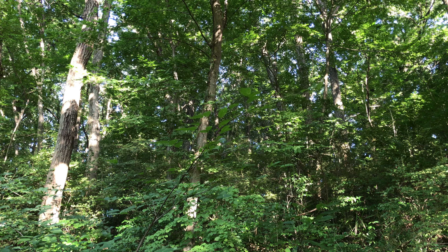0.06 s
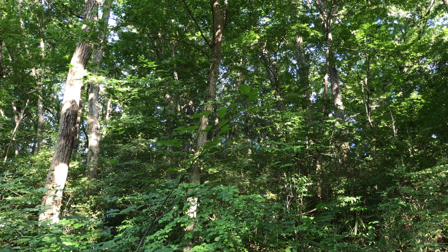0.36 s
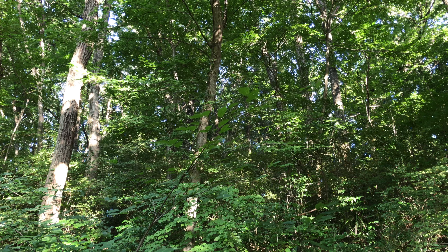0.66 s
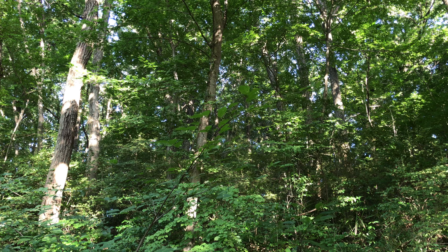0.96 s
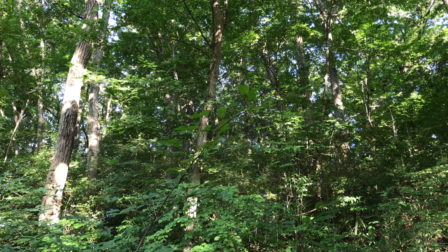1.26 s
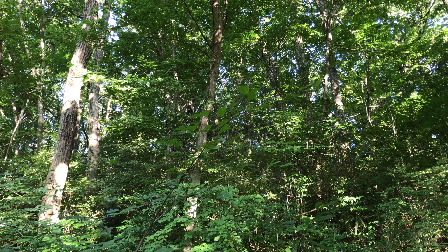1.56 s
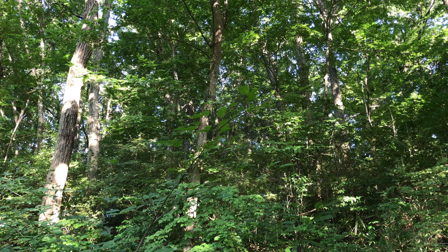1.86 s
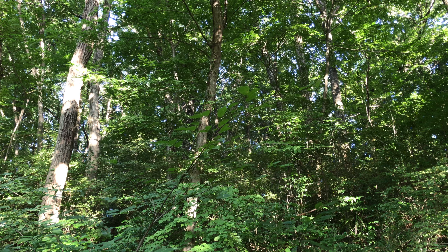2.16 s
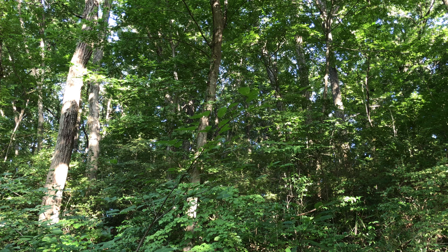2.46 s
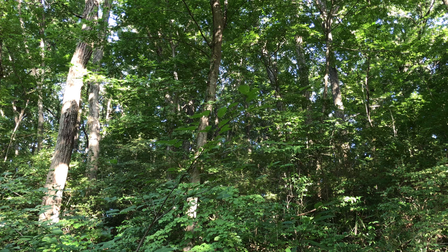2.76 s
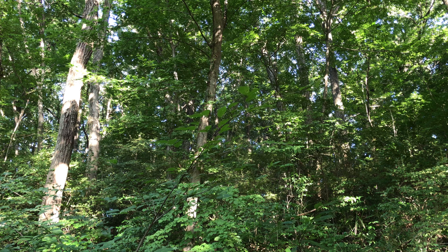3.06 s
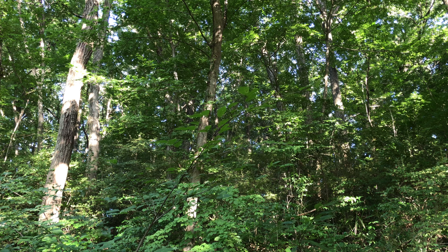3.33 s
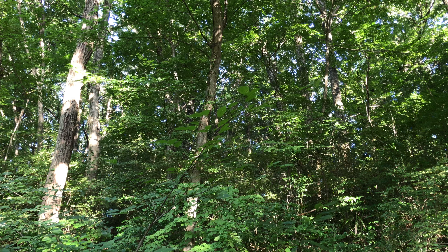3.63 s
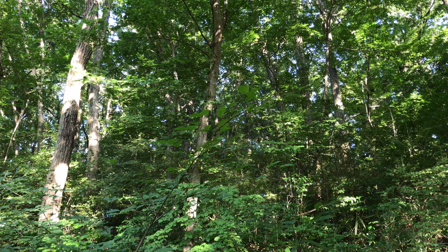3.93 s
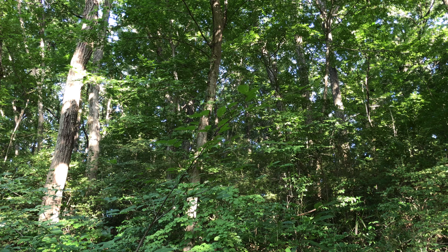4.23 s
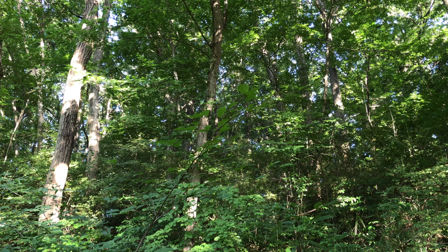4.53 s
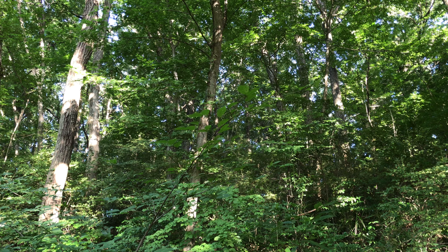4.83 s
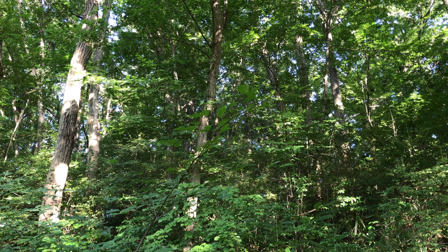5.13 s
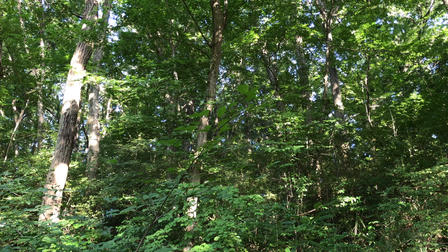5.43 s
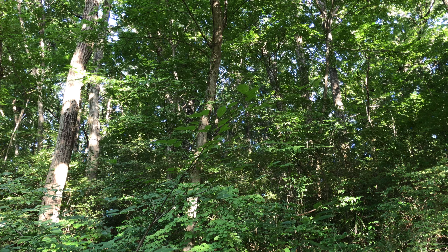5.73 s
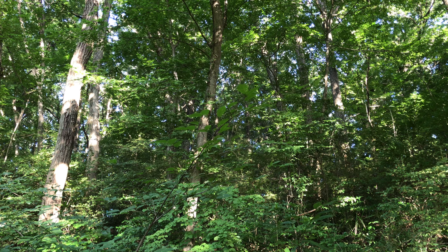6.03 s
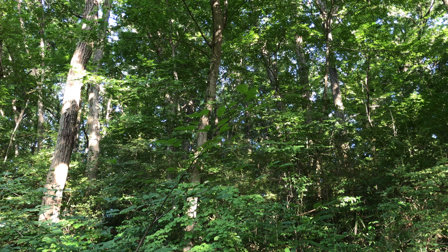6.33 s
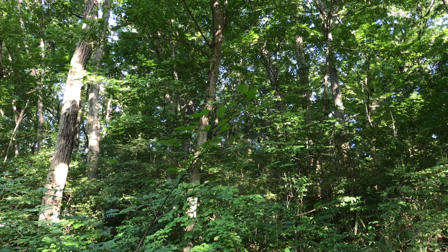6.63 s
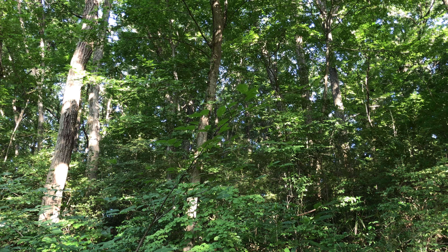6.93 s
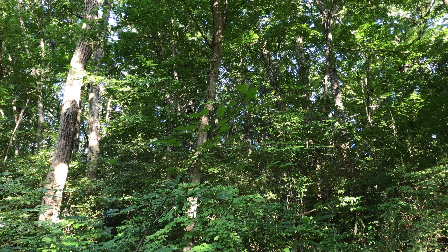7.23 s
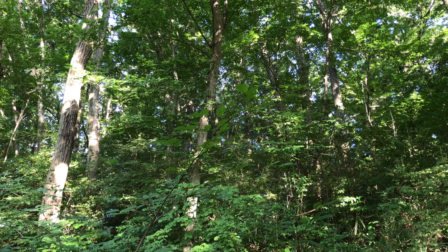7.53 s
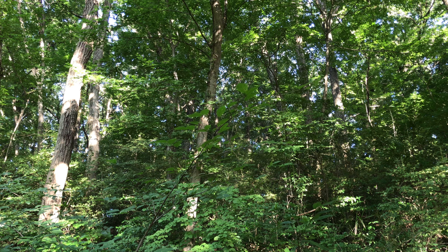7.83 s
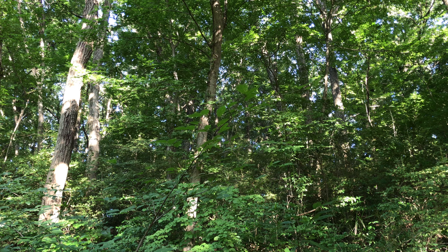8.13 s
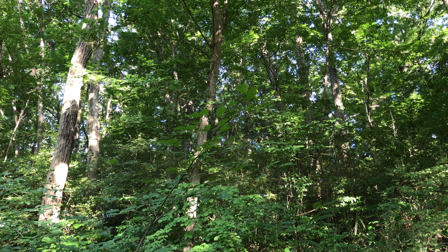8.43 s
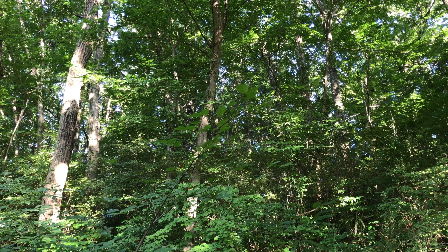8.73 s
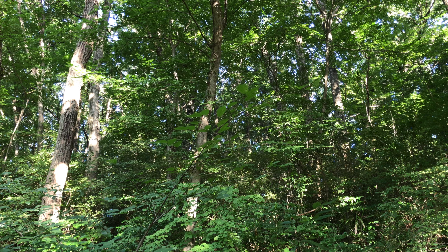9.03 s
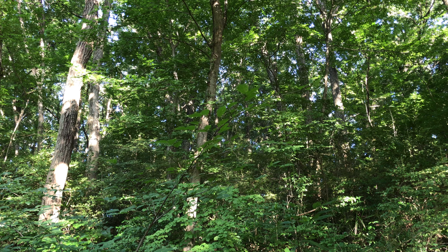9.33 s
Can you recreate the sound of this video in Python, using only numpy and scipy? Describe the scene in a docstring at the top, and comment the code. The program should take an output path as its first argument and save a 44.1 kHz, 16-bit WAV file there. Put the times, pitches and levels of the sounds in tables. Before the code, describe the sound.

In a forest, two cicadas trill close to the microphone, one joining the other in quick ringing pulses that sag in pitch, slow and fade. After a lull with faint far calls, several swell together more loudly, and new trills begin near the end. A distant chorus comes in waves. A thin insect sizzle and a faint low rumble continue throughout.

```python
"""A buzzing cicada trill swells close to the microphone, over a thin sizzle: evening in a summer forest.
Single cicadas trill, most close by, a few faint and far off: runs of short syllables from buckling
tymbal ribs that swell, sag in pitch and slow down. A distant chorus answers in waves. Day cicadas keep
up the sizzle, and one very high insect pulses, climbing in pitch. Leaves and trunks scatter the
insects' sound, and a faint low rumble lies beneath."""
import sys
import numpy as np
from scipy import signal
from scipy.fft import rfft, irfft, next_fast_len
from scipy.io import wavfile

SR = 44100
rng = np.random.default_rng(int(sys.argv[2]) if len(sys.argv) > 2 else 0)


def store_wav(level_fs):
    """Save 16-bit WAV to argv[1]."""
    pcm = np.round(np.clip(np.atleast_2d(level_fs), -1, 1) * 32767)
    wavfile.write(sys.argv[1], SR, pcm.T.astype(np.int16))


N = 414099
TIME = np.arange(N) / SR


def from_db(db):
    """Decibels to gain."""
    return 10 ** (np.asarray(db) / 20)


def rms_one(x):
    """Scale to rms 1."""
    return x / np.sqrt(np.mean(x ** 2) + 1e-20)


def in_time(rows):
    """Each column of a timed curve at every sample."""
    time_s, *columns = np.transpose(rows)
    return [np.interp(TIME, time_s, column) for column in columns]


def drift(rate_hz):
    """Slow random wander with a spread of about 1."""
    pole = np.exp(-20 * np.pi * rate_hz / SR)   # runs at a tenth of the sample rate
    slow = signal.lfilter([1], [1, -2 * pole, pole * pole], rng.standard_normal(N // 10 + 8002))[8000:]
    return np.interp(np.arange(N) / 10, np.arange(len(slow)), rms_one(slow))


def coloured_noise(spectrum, skirt_db):
    """Noise of rms 1 with a given spectrum, falling by skirt_db an octave beyond its ends."""
    size = next_fast_len(N)
    hz, db = np.transpose(spectrum)
    octave = np.log2(np.arange(size // 2 + 1) * SR / size + 1)
    beyond = np.abs(octave - np.clip(octave, np.log2(hz[0]), np.log2(hz[-1])))
    gain = from_db(np.interp(octave, np.log2(hz), db) - skirt_db * beyond)
    return rms_one(irfft(rfft(rng.standard_normal(N), size) * gain, size)[:N])


def moving_band(centre_hz, width_hz):
    """Noise in a resonance whose centre moves."""
    lowpass = signal.butter(1, width_hz / 2, fs=SR, output="sos").repeat(2, axis=0)
    slow = signal.sosfilt(lowpass, rng.standard_normal((2, N)))
    phase = 2 * np.pi * np.cumsum(centre_hz) / SR
    return rms_one(slow[0] * np.cos(phase) + slow[1] * np.sin(phase))


def add(out, centre_s, sound):
    """Mix a sound in, centred on a moment."""
    at = int(centre_s * SR) - len(sound) // 2 + np.arange(len(sound))
    inside = (at >= 0) & (at < N)
    out[at[inside]] += sound[inside]


def forest(x, leaves_db, trunks_db, leaves_t60, trunks_t60=1.0):
    """The way to the microphone: direct sound, quick scatter off leaves, a long tail off trunks."""
    decays = from_db(-60 * TIME[:SR] / np.array([[leaves_t60], [trunks_t60]]))
    leaves, trunks = rng.standard_normal((2, SR)) * decays
    echoes = (from_db(leaves_db) * rms_one(leaves) + from_db(trunks_db) * rms_one(trunks)) / np.sqrt(SR)
    echoes[0] = 1   # the direct sound
    return signal.fftconvolve(x, echoes / np.linalg.norm(echoes))[:N]


# Spectrum of the far rumble: frequency_hz, relative_db
RUMBLE_SPECTRUM = [(25, -31), (34, -14.5), (48, 1.5), (61, -3), (78, -6), (100, -12), (146, -19.5),
                   (275, -22.5), (493, -29), (900, -31.5), (1500, -34.5), (2400, -32)]


def rumble(level_db=-54.0, hum_hz=64, hum_db=-58.5):
    """A far low rumble that thins out into faint hiss, with a wavering hum in it."""
    low = from_db(level_db) * coloured_noise(RUMBLE_SPECTRUM, skirt_db=12)
    hum_rms = from_db(hum_db + 1.2 * drift(1.9))
    hum_phase = 2 * np.pi * np.cumsum(hum_hz + 1.67 * drift(4.3)) / SR
    return low + hum_rms * np.sqrt(2) * np.sin(hum_phase)


# Loudness of the day cicadas at the microphone: time_s, level_db
SIZZLE_LEVEL = [(0, -43.5), (1, -42.5), (2.5, -41.5), (4.2, -42), (5.5, -41.5), (7.2, -40.5), (8.3, -42),
                (9.39, -42)]
# Spectrum of their sizzle: frequency_hz, relative_db
SIZZLE_SPECTRUM = [(1700, -48), (2350, -25.5), (2750, -21), (3200, -25.5), (3700, -19), (4300, -9),
                   (5000, -4.5), (5750, -0.5), (6400, -3.5), (7400, -11), (8400, -5), (9200, -11.5),
                   (10200, -20.5), (11300, -13), (16000, -18)]


def day_cicadas(flicker_db=0.14):
    """Out in the trees, so many rasp without a break that their clicks merge into a sizzle."""
    level_db, = in_time(SIZZLE_LEVEL)
    rasp = from_db(level_db + flicker_db * drift(25)) * coloured_noise(SIZZLE_SPECTRUM, skirt_db=24)
    return forest(rasp, leaves_db=-5.5, trunks_db=-7.5, leaves_t60=0.082)


# The high insect's climb, heard through leaves: time_s, centre_hz, relative_db, pulses_per_s
INSECT_CLIMB = [(0, 11320, -79, 16), (1.5, 11880, -73, 15.5), (3, 12840, -57, 15.2),
                (4.3, 12960, -54.5, 15.2), (5.5, 13700, -52.5, 15.7), (7, 13830, -48.5, 14.6),
                (8.2, 14240, -48.5, 15.3), (9.39, 14500, -47, 14.3)]


def high_insect(pulse_db=2.5, buzz_hz=385, buzz_depth=0.27, octave_db=-6, gain_db=3.5):
    """A pulsing rasp in one broad resonance that climbs slowly, with a weaker one an octave below."""
    centre_hz, level_db, pulses_per_s = in_time(INSECT_CLIMB)
    pulse_phase = 2 * np.pi * np.cumsum(pulses_per_s * (1 + 0.038 * drift(4.2))) / SR
    pulses = rms_one(from_db(pulse_db * np.cos(pulse_phase)))
    buzz_phase = 2 * np.pi * np.cumsum(buzz_hz * (1 + .015 * drift(7.7))) / SR
    rasp = 1 + buzz_depth * np.cos(buzz_phase)
    ring = moving_band(centre_hz, width_hz=3300)
    ring += from_db(octave_db) * moving_band(centre_hz / 2, width_hz=3800)
    call = from_db(level_db + gain_db) * pulses * rasp * ring
    call = signal.sosfilt(signal.butter(4, 4200, "high", fs=SR, output="sos"), call)
    return forest(call, leaves_db=5, trunks_db=-16, leaves_t60=0.15)


def syllable(pitch_hz, body, throb=0.25, swing=0.061, arch=0.00891, jitter=0.00827, slack_hz=2100):
    """Tymbal ribs buckle in quick succession and keep the hollow abdomen ringing on its partials."""
    rib_hz, length_s, *partials_db = body
    length_s *= min(pitch_hz / slack_hz, 1) ** 9   # a slack body sings low and short
    position = np.linspace(-1, 1, int(length_s * SR))
    unsteady, uneven, force = [np.interp(position, np.linspace(-1, 1, len(row)), row)
                               for row in rng.standard_normal((3, 18))]
    offsets = rng.uniform(0, 2 * np.pi, len(partials_db) + 1)
    ribs = offsets[0] + 2 * np.pi * np.cumsum(rib_hz * (1 + 0.093 * uneven)) / SR
    # the pitch arches with the muscle's pull and dips at each buckle
    arched_hz = pitch_hz * (1 - arch * position ** 2 + jitter * unsteady)
    phase = 2 * np.pi * np.cumsum(arched_hz) / SR - swing * np.sin(ribs)
    # higher partials die sooner between buckles, so they throb more deeply
    buckle = throb * np.cos(ribs)
    tone = sum(from_db(db) * (1 + np.sqrt(k) * buckle) * np.sin(k * phase + offsets[k])
               for k, db in enumerate(partials_db, 1))
    # each buckle also makes a faint bright click
    bright_noise = np.diff(np.resize(rng.standard_normal(4096), len(position) + 1))
    clicks = from_db(-27) * bright_noise * (1 + np.cos(ribs)) / 2
    envelope = np.clip((1 - np.abs(position)) / 0.24, 0, 1)
    return (tone + clicks) * envelope * rms_one(from_db(2.6 * force))


def song_contour(age, pitch_hz, scoop_hz, sag_hz_per_s, full_db, soft_db, rise_s, fade_from_s,
                 fade_db_per_s, scoop_s=.35):
    """Pitch and level at each age of a song: it pulls up to pitch and sags; it swells, holds and fades."""
    hz = pitch_hz - scoop_hz * np.exp(-age / scoop_s) - sag_hz_per_s * age
    swell_db = -soft_db * np.maximum(1 - age / rise_s, 0)
    fade_db = -fade_db_per_s * np.maximum(age - fade_from_s, 0)
    return hz, full_db + swell_db + fade_db


# The body shared by the distant chorus: rib_hz, syllable_s, partial_2_db to partial_5_db
FAR_BODY = (298.5, 0.23, 3, -8.5, -9, -17)
# Waves of song from deep in the forest: start_s, detune_share, partial_1_db, pitch_hz, scoop_hz,
# sag_hz_per_s, full_db (relative), soft_db, rise_s, fade_from_s, fade_db_per_s
FAR_WAVES = [(-3.5, .028, -12,   2240, 50, 18,   -37, 18, .8, 1.72, 9.5),
             (0.42, .032, -7.5,   2210, 55, 21,   -38, 15.5, 0.77, 1.73, 9.5),
             (5, .02, -12,   2180, 110, 26.6,   -30.5, 22, 0.69, 0.95, 11),
             (8.5, .031, -8.5,   2225, 51, 25,   -40.5, 6, 0.47, 1.8, 10)]


def far_chorus(syllables_per_s=70, count=350, carry=.15):
    """Many distant singers, each a little off the common pitch, blur into a shimmering band."""
    rib_hz, length_s, *overtones_db = FAR_BODY
    chorus = np.zeros(N)
    for start_s, spread, lowest_db, *song in FAR_WAVES:
        late, detune = rng.standard_normal((count, 2)).T
        age = np.abs(np.arange(count) + late / 2) / syllables_per_s
        pitch_hz, level_db = song_contour(age, *song)
        pitch_hz *= 1 + spread * detune
        # the lowest partial carries best, so it stands out more where the wave is quiet
        carried_db = lowest_db + carry * (level_db.max() - level_db)
        for at_s, hz, db, low_db in zip(start_s + age, pitch_hz, level_db, carried_db):
            if -length_s < at_s < N / SR + length_s:
                add(chorus, at_s, from_db(db) * syllable(hz, (rib_hz, length_s, low_db, *overtones_db)))
    overlap = syllables_per_s * length_s
    return forest(chorus / np.sqrt(overlap), leaves_db=4.5, trunks_db=4.0, leaves_t60=0.12)


def trill_rhythm(count, first_gap_s, slowing_s, drag_s, tiring_syllables=2.2):
    """Age of each syllable: the gaps widen steadily, then drag as the singer tires over the last few."""
    k = np.arange(count - 1)
    gaps = first_gap_s + slowing_s * k + drag_s * np.exp((k - k[-1]) / tiring_syllables)
    return np.append(0, np.cumsum(gaps))


# Single cicadas in the trees, most close to the microphone, row 4 (from 0) far off:
# echo_db (relative), rib_hz, longest_syllable_s, partial_1_db to partial_5_db
SINGERS = [(-6, 305, .046, -19, -0.5, -19, -14.5, -30), (1, 300, .042, -14.5, -2.2, -7.5, -2.5, -19),
           (-5.5, 315, .04, -8.5, 0.5, -7, -5, -21), (-0.5, 230, 0.0478, -7, 0.8, -7, -1.5, -10.5),
           (0.5, 222, .056, -0.5, 3.5, -19, -14, -22), (-2.5, 325, .037, -15.5, -4, -8, -2.5, -10)]
# Their trills: start_s, singer_row, syllable_count, first_gap_s, slowing_s, drag_s, pitch_hz, scoop_hz,
# sag_hz_per_s, full_db (relative), soft_db, rise_s, fade_from_s, fade_db_per_s
TRILLS = [(-0.9, 4, 15, .095, .001, .01, 2160, 20, 15, -62, 5, .4, 1.5, 6),
          (0.329, 0, 32, .0843, .00073, .061, 2080, 225, 15, -37.2, 3, .6, 1.9, 11),
          (1.076, 1, 20, .0914, .00094, .081, 2150, 10, 22, -37, 5, .4, 1.75, 16),
          (2.35, 4, 16, .12, .001, .06, 2330, 10, 30, -57, 2, .3, .8, 8),
          (3.09, 4, 16, .118, .001, .03, 2130, 10, 20, -59, 2, .2, .5, 2.5),
          (5.129, 2, 23, .0826, .00089, .174, 2165, 150, 52, -31.3, 14, .35, 1.95, 6),
          (5.24, 3, 33, .0884, .00087, .032, 2250, 90, 38, -36.2, 8, .25, 1.5, 5.5),
          (5.431, 5, 24, .0924, .00068, .239, 2170, 30, 42, -33.3, 20, .55, 1.5, 1.5),
          (8.462, 0, 32, .08, .001, .061, 2060, 205, 15, -36.2, 2.5, .6, 1.9, 11),
          (8.984, 1, 20, .094, .00094, .081, 2145, 15, 15, -36, 3, .4, 1.75, 16)]


def single_trills(gain_db=0.63, timid_db=-8.5, scatter_db=0.57, scatter_hz=12):
    """Each singer trills from its own tree and so has echoes of its own."""
    trees = np.zeros((len(SINGERS), N))
    for start_s, singer, count, first_gap_s, slowing_s, drag_s, *song in TRILLS:
        body = SINGERS[singer][1:]
        age = trill_rhythm(count, first_gap_s, slowing_s, drag_s)
        pitch_hz, level_db = song_contour(age, *song)
        detune, push = rng.standard_normal((count, 2)).T
        pitch_hz += scatter_hz * detune
        level_db += gain_db + scatter_db * push
        level_db[0] += timid_db   # a trill opens with a timid syllable
        for at_s, hz, db in zip(start_s + age, pitch_hz, level_db):
            add(trees[singer], at_s, from_db(db) * syllable(hz, body))
    return sum(forest(tree, leaves_db=echo_db - 4.0, trunks_db=echo_db + 3.0, leaves_t60=0.095)
               for tree, (echo_db, *_) in zip(trees, SINGERS))


def scene():
    """One microphone among the trees, feeding both channels."""
    mono = single_trills() + far_chorus() + day_cicadas() + high_insect() + rumble()
    return np.array([mono, mono])


def record(dry, cutoff_hz=15750):
    """The top of the treble is cut steeply."""
    return signal.sosfilt(signal.ellip(12, .1, 80, cutoff_hz, fs=SR, output="sos"), dry)


dry = scene()
out = record(dry)
store_wav(out)
```